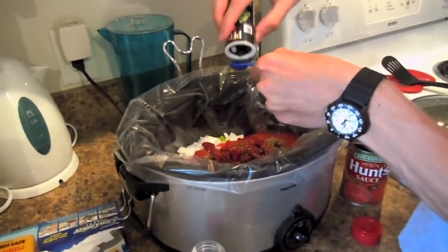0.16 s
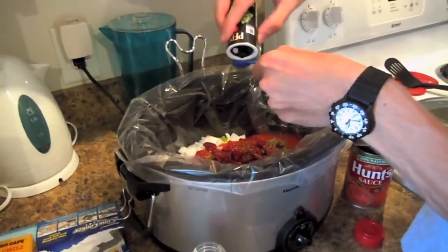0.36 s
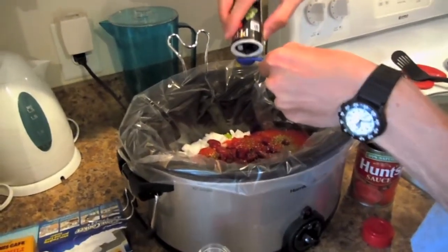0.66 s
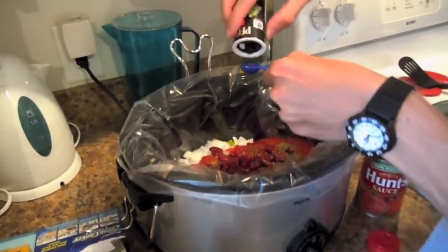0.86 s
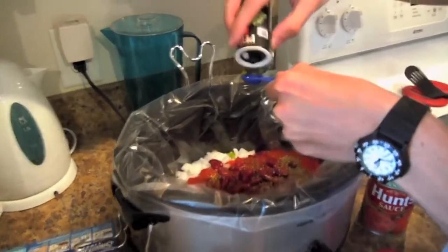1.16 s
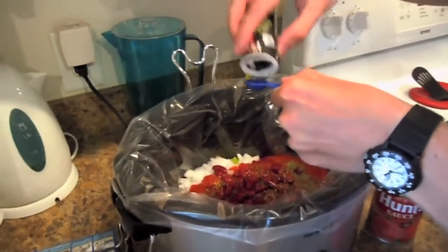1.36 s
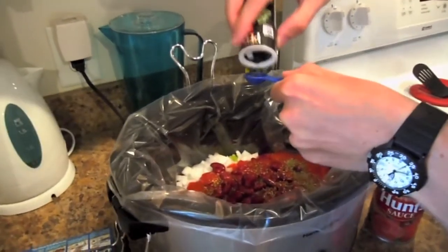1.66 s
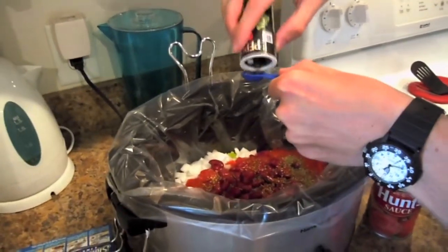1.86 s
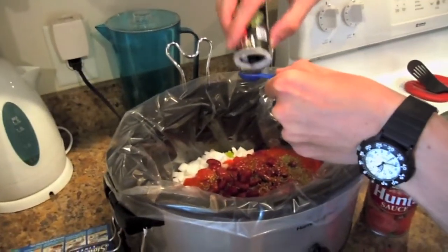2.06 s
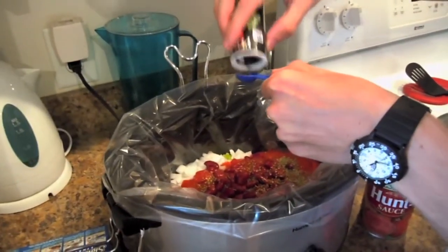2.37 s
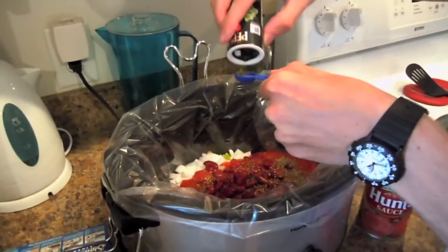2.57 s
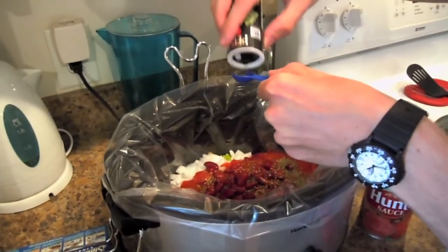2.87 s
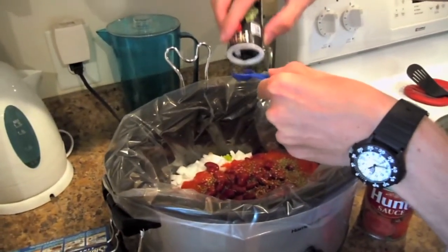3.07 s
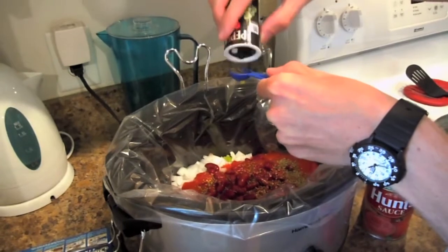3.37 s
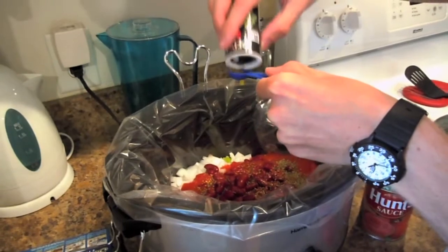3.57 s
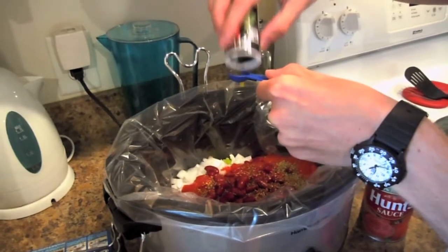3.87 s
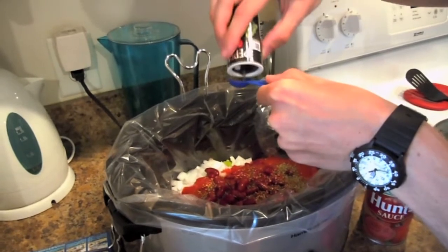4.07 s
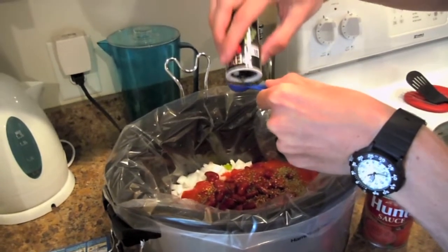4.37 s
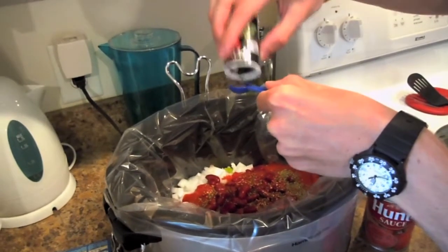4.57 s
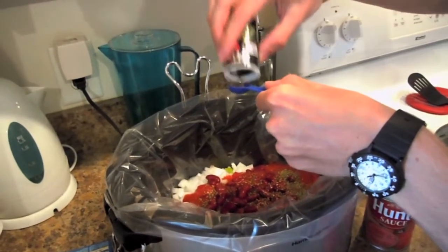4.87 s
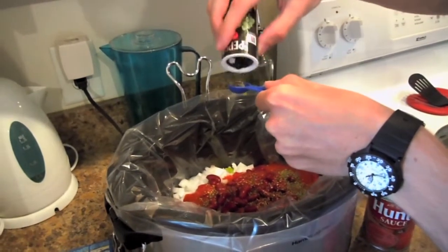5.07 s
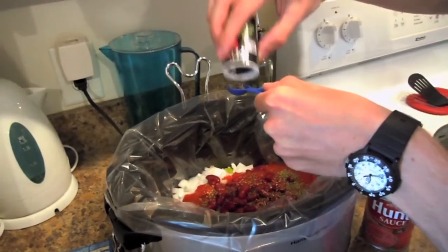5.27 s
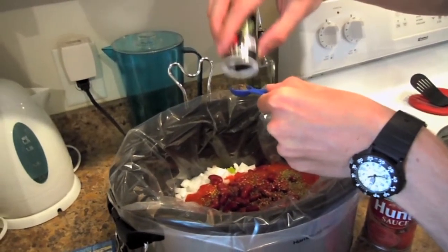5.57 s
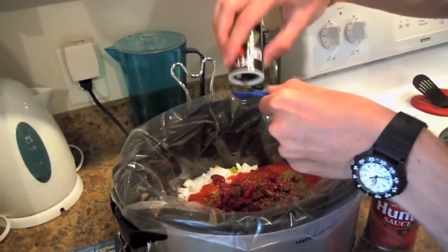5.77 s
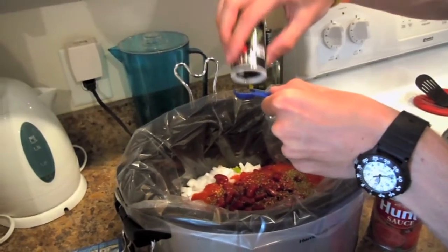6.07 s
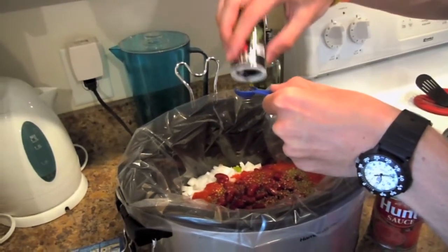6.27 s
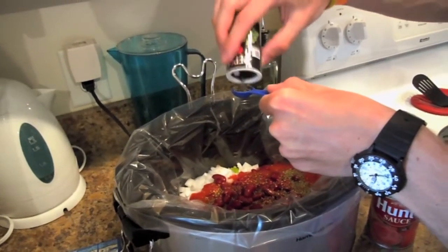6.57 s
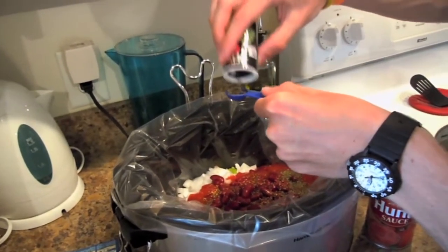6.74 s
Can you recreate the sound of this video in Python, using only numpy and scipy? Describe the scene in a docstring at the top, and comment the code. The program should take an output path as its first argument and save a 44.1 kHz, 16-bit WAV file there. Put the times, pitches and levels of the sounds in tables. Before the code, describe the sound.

Sharp, bright snaps of a hand-turned pepper grinder come about six a second, then stop, leaving faint finger ticks and a soft hum.

```python
"""Sharp snaps, about six a second, come from a small pepper mill twisted over a slow cooker in a kitchen.
Each snap is a slipping tooth that rings the mill's body, bounces off pot and wall and fades in the room.
An appliance hums and a power supply whines thinly all the way through.
Fingers shifting on the mill make faint ticks, which go on after the twisting stops near five seconds."""
import sys
import numpy as np
from scipy import signal
from scipy.fft import rfft, irfft, next_fast_len
from scipy.io import wavfile

SR = 44100
rng = np.random.default_rng(int(sys.argv[2]) if len(sys.argv) > 2 else 0)


def materialize(psi):
    """Save the field psi as 16-bit PCM at rate SR to the path in sys.argv[1].

    A 1-D psi becomes a single channel; in a 2-D psi each row is a channel.
    """
    bounded = np.clip(np.atleast_2d(psi).T, -1, 1)
    quanta = np.round(bounded * 32767).astype(np.int16)
    wavfile.write(sys.argv[1], SR, quanta)


N = 304443
TIME = np.arange(N) / SR

# one snap for each tooth that slips: start_s, strength_db
SNAPS = [(-0.046, 4.5), (0.11, 2), (0.4975, -4), (0.649, 1.5), (0.7961, -1.5), (0.9452, 5), (1.1049, -2.3),
         (1.2568, 0.7), (1.4197, 0), (1.5797, -2.1), (1.7284, -1.5), (1.8861, -0.5), (2.0302, 4),
         (2.1822, 0.8), (2.339, 0), (2.4984, 1), (2.6565, -2.1), (2.817, -2), (2.9674, -2), (3.1286, -1.8),
         (3.2852, -0.2), (3.4454, -2.5), (3.5931, 0.1), (3.753, -0.6), (3.9071, 3), (4.0727, -0.5),
         (4.2368, -4), (4.3923, -3.5), (4.5451, -3), (4.692, -0.2), (4.853, -3)]
# the tones of the mill's body: pitch_hz, relative_db, ring_s (time to fade by 60 dB)
BODY_TONES = [(830, -46.5, 0.021), (1640, -29.5, 0.0028), (2730, -24.5, 0.003), (3270, -17, 0.0032),
              (4190, -17, 0.0044), (4910, -18.5, 0.0042), (5680, -17.5, 0.0038), (6540, -27, 0.014),
              (7047, -24.5, 0.015), (7796, -23, 0.015), (8660, -21.5, 0.0083), (9470, -29, 0.015),
              (10380, -25, 0.0036), (11960, -30, 0.0044), (12700, -31.5, 0.0047)]
# the longer ring of the hollow inside: pitch_hz, relative_db, ring_s
HOLLOW_TONES = [(1551, -54, .16), (1629, -52, .18), (1724, -55, .14), (1915, -59, .11)]
# tone colour of a snap; force adds mostly treble: pitch_hz, upright_db, tipped_db, db_per_strength_db
SNAP_COLOUR = [(860, 1.5, -5, 0.3), (1940, 0.5, -2, -0.67), (3660, -2, 2.4, -0.19), (5800, 0.4, 0.5, 0.46),
               (7900, 1.5, -0.4, 0.13), (10800, 0.4, 0.5, 0.3)]
# a snap's bite, the boost or cut of an octave-wide band around BITE_HZ: time_s, boost_db
BITE = [(0.1, -2.2), (1.9, 2), (3.0, 0.0), (4.9, -3.5)]
# bounces off pot, wall and stove: delay_ms, gain
BOUNCES = [(2.063, 0.69), (2.493, 0.68), (3.159, 0.21), (4.13, 0.049), (9.3, 0.12)]
# tone colour of a snap as the kitchen returns it: pitch_hz, relative_db
KITCHEN_COLOUR = [(500, -48), (850, -18), (1400, -15.5), (1600, 0.5), (1900, -6.5), (2250, -11.5),
                  (2600, -6.5), (3500, -5), (4600, -4), (5200, -0.5), (7200, -0.5), (8800, -4),
                  (11000, -12.5), (14000, -21)]
# tone colour of the steady room noise: pitch_hz, relative_db
NOISE_COLOUR = [(20, -0.7), (50, 1), (95, -1.1), (160, -3.5), (230, -5.5), (400, -9.0), (620, -12.5),
                (830, -15), (1200, -16), (1900, -19.5), (2800, -19.5), (5000, -23), (8000, -22.5),
                (13500, -27)]
# how alike that noise is on the left and right: pitch_hz, likeness (1 = the same)
NOISE_LIKENESS = [(60, 0.93), (150, 0.88), (380, 0.65), (950, 0.37), (2380, 0.27), (5980, -0.1),
                  (15000, 0.06)]
# narrow peaks in the appliance's rushing sound: pitch_hz, half_width_hz, level_db
RUSH_PEAKS = [(795, 23, -70.5), (1383, 45, -68.5), (2460, 42, -70), (2610, 60, -70.5), (3670, 51, -69)]
# motor and mains hum: pitch_hz, level_db
HUM_TONES = [(30, -62), (120, -56.3), (222, -71)]
# light ticks of fingers on the mill: start_s, strength_db
TICKS = [(.3148, -28.5), (.3821, -29.5), (1.4971, -29.5), (3.5215, -28), (5.148, -36), (5.302, -38),
         (6.239, -32.5), (6.717, -31), (6.868, -37)]

TIP_S = 3.05  # from here on the mill is tipped a little to the left
BITE_HZ, NOISE_TOP_HZ = 3770, 14200


def from_db(db):
    """Turn decibels into a number to multiply by."""
    return 10 ** (np.asarray(db) / 20)


def rms_one(x):
    """Scale a signal so that its average power is 1."""
    return x / np.sqrt(np.mean(x ** 2) + 1e-20)


def at_hz(table, hz, column=1):
    """Read a table at any pitch, blending between its rows."""
    table = np.array(table)
    return np.interp(np.log(hz + 1), np.log(table[:, 0]), table[:, column])


def add(out, start_s, sound):
    """Mix a short sound in; any part before time zero is dropped."""
    at = round(start_s * SR)
    sound, at = sound[max(-at, 0):], max(at, 0)
    out[at:at + len(sound)] += sound[:N - at]


def stereo_noise(alike, size):
    """Left and right noise spectra: the same where alike is 1, unrelated where it is 0."""
    shared, apart = rfft(rng.standard_normal((2, size)))
    return np.sqrt(1 + alike) * shared + np.sqrt(1 - alike) * apart * [[1], [-1]]


def struck(hz, db, ring_s, size):
    """A struck body rings as fading sine waves; neighbouring tones swing opposite ways."""
    t = TIME[:size, None]
    tones = from_db(db - 60 * t / ring_s) * np.sin(2 * np.pi * hz * t)
    return tones @ (-1.) ** np.arange(len(hz))


def snap_colour(start_s, strength_db, hz):
    """A snap's boost in dB at each pitch, from how the mill is held, the force and the bite."""
    held_db = at_hz(SNAP_COLOUR, hz, column=1 if start_s < TIP_S else 2)
    force_db = strength_db * at_hz(SNAP_COLOUR, hz, column=3)
    bite_band = .5 ** ((2 * np.log2((hz + 1) / BITE_HZ)) ** 2)
    return held_db + force_db + np.interp(start_s, *np.transpose(BITE)) * bite_band


def mill_snaps(level_db, scatter_db, detune, crunch_s, crack_hz, crack_s, hollow_db):
    """Each tooth slips with a crack and a crunch that ring the body. Returns direct sound and echoes."""
    direct, echoes = np.zeros((2, N))
    hz, db, ring_s = np.transpose(BODY_TONES)
    hollow_hz, hollow_levels, hollow_s = np.transpose(HOLLOW_TONES)
    for start_s, strength_db in SNAPS:
        pitch_luck, level_luck = rng.standard_normal((2, len(hz)))
        levels = db + snap_colour(start_s, strength_db, hz) + scatter_db * level_luck
        body = struck(hz * (1 + detune * pitch_luck), levels, ring_s, size=2048)
        roughness = 0.18 if start_s < TIP_S else 0.079
        crunch = roughness * rng.standard_normal(128) * np.exp(-TIME[:128] / crunch_s)
        crunch[0] = 1  # the first blow
        snap = from_db(strength_db + level_db) * signal.lfilter(crunch / np.linalg.norm(crunch), 1, body)
        add(direct, start_s, snap)
        add(echoes, start_s, near_echoes(snap, sway=0.005))
        # the crack is beamed straight ahead, so it has no echo; it grows by 3.5 dB a second
        crack_db = strength_db - 37 + 3.5 * start_s
        add(direct, start_s, struck(np.array([crack_hz]), crack_db, crack_s, size=256))
        hollow = struck(hollow_hz, hollow_levels + rng.normal(0, 1.7, len(hollow_hz)), hollow_s, 10000)
        add(direct, start_s, from_db(hollow_db - 2.5 * strength_db) * hollow)  # quieter for hard snaps
    # so small a body gives off no bass
    return signal.sosfilt(signal.butter(2, 680, "high", fs=SR, output="sos"), [direct, echoes])


def near_echoes(snap, sway):
    """Close surfaces send back late copies; the hand sways, so the delays vary from snap to snap."""
    cycles = np.arange(len(snap) // 2 + 1) / len(snap)
    delays = [(ms * (1 + sway * rng.standard_normal()) * SR / 1000, gain) for ms, gain in BOUNCES]
    return irfft(rfft(snap) * sum(gain * np.exp(-2j * np.pi * cycles * lag) for lag, gain in delays))


def kitchen_tail(near_db, near_s, room_db, room_s, build_s, first_s, alike_hz, tint, size=16384):
    """Quick scatter from pot and counter, then the room's slow fade; new each snap, as the mill moves."""
    out, t = np.zeros((2, N)), TIME[:size]
    hz = np.arange(size // 2 + 1) * SR / size
    alike = 1 / (1 + (hz / alike_hz) ** 2)  # left and right agree only in the lows
    fade = from_db(near_db - 60 * t / near_s) + from_db(room_db - 60 * t / room_s)
    fade *= np.clip((t - first_s) / build_s, 0, 1)
    for start_s, strength_db in SNAPS:
        colour_db = at_hz(KITCHEN_COLOUR, hz) + tint * snap_colour(start_s, strength_db, hz)
        tail = irfft(from_db(colour_db) * (hz < NOISE_TOP_HZ) * stereo_noise(alike, size))
        sent_db = -2.5 if start_s < TIP_S else -1.86  # share sent into the room
        for channel, sound in zip(out, from_db(strength_db + sent_db) * fade * rms_one(tail)):
            add(channel, start_s, sound)
    return out


def room_and_appliance(noise_db, waver_db, wavers_per_s):
    """Steady room noise, an appliance's rush, and motor and mains hum that slowly wavers in level."""
    size = next_fast_len(N)
    hz = np.arange(size // 2 + 1) * SR / size
    in_range = hz < NOISE_TOP_HZ
    noise = stereo_noise(np.clip(at_hz(NOISE_LIKENESS, hz), 0, 1), size) * in_range
    power = (from_db(noise_db) * rms_one(from_db(at_hz(NOISE_COLOUR, hz)) * in_range)) ** 2
    for pitch_hz, half_width_hz, db in RUSH_PEAKS:
        peak = 1 / (1 + ((hz - pitch_hz) / half_width_hz) ** 2)
        power += (from_db(db) * rms_one(peak)) ** 2
    out = np.sqrt(power.mean()) * rms_one(irfft(noise * np.sqrt(power), size)[:, :N])
    for pitch_hz, db in HUM_TONES:
        hum = rms_one(np.sin(2 * np.pi * (pitch_hz * TIME + rng.random())))
        drift = np.interp(TIME * wavers_per_s, np.arange(64), rng.standard_normal(64))
        out += from_db(db + waver_db * drift) * hum
    return out


def power_whine(pitch_hz, mains_hz, level_db, swing_hz, spike, right_over_left_db):
    """A switching power supply sings; ripple from the mains flicks its pitch up once a cycle."""
    ripple = 2 * np.pi * mains_hz * TIME
    hz = pitch_hz + swing_hz * (np.cos(ripple) + spike * np.cos(2 * ripple))
    tone = rms_one(np.sin(2 * np.pi * np.cumsum(hz) / SR))
    return tone * from_db(level_db + right_over_left_db * np.array([[-.5], [.5]]))


def finger_ticks(boost_db, rub_s, low_cut_hz):
    """Fingers shift on the mill: each tiny, bright rub rings its body."""
    out = np.zeros(N)
    body = struck(*np.transpose(BODY_TONES), size=1024)
    for start_s, strength_db in TICKS:
        rub = rng.standard_normal(1024) ** 3 * np.exp(-TIME[:1024] / rub_s)  # cubing makes noise gritty
        add(out, start_s, from_db(strength_db + boost_db) * np.convolve(rub / np.linalg.norm(rub), body))
    return signal.sosfilt(signal.butter(2, low_cut_hz, "high", fs=SR, output="sos"), out)


def mic_openings(x, left_hz, left_q, right_hz, right_q, lead_s=0):
    """Two microphone openings ring at pitches set by the sound's direction; higher q rings longer."""
    size = next_fast_len(N + 2048)
    hz = np.arange(size // 2 + 1) * SR / size
    left = 1 / (1 - (hz / left_hz) ** 2 + 1j * hz / (left_hz * left_q))
    right = 1 / (1 - (hz / right_hz) ** 2 + 1j * hz / (right_hz * right_q))
    # only the contrast between the sides is applied, half to each; the left comes lead_s early
    contrast = np.sqrt(left / right) * np.exp(1j * np.pi * hz * lead_s)
    return irfft(rfft(x, size) * np.array([contrast, 1 / contrast]), size)[:, :N]


def scene():
    """The mill close by, its echoes from the side, the kitchen, and the steady hum and whine."""
    direct, echoes = mill_snaps(level_db=0.5, scatter_db=1.2, detune=0.0082, crunch_s=0.00078,
                                crack_hz=4830, crack_s=0.0007, hollow_db=-8.0)
    direct = direct + finger_ticks(boost_db=11.0, rub_s=0.01, low_cut_hz=6070)
    room = kitchen_tail(near_db=-29, near_s=0.094, room_db=-40.5, room_s=0.41,
                        build_s=0.0027, first_s=0.00064, alike_hz=4430, tint=0.37)
    upright, tipped = direct * (TIME < TIP_S), direct * (TIME >= TIP_S)
    out = mic_openings(upright, left_hz=11400, left_q=2.5, right_hz=8060, right_q=5.8)
    out += mic_openings(tipped, left_hz=9550, left_q=2.9, right_hz=8100, right_q=6.6, lead_s=13e-6)
    out += mic_openings(echoes, left_hz=9200, left_q=4.3, right_hz=7500, right_q=4.5, lead_s=9e-6)
    out += mic_openings(room, left_hz=9700, left_q=4.2, right_hz=8140, right_q=5.1)
    out += room_and_appliance(noise_db=-48.5, waver_db=1.5, wavers_per_s=0.59)
    return out + power_whine(pitch_hz=7897, mains_hz=60, level_db=-69.5, swing_hz=62, spike=0.84,
                             right_over_left_db=25.5)


def record(dry):
    """Cut the highest treble, above 14900 Hz."""
    return signal.sosfilt(signal.cheby1(10, .1, 14900, fs=SR, output="sos"), dry)


dry = scene()
out = record(dry)
materialize(out)
```